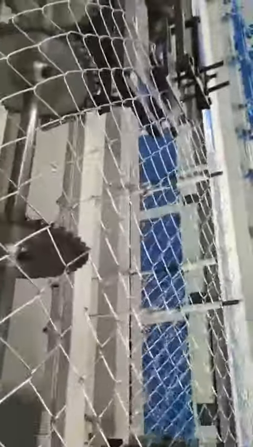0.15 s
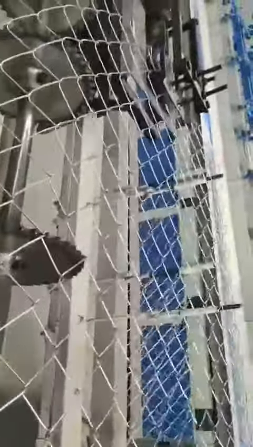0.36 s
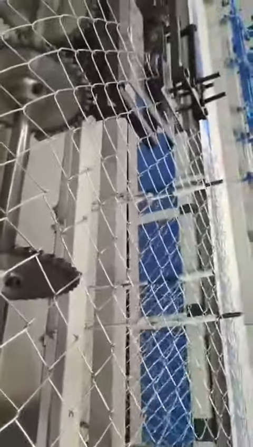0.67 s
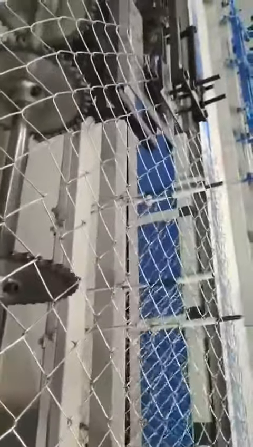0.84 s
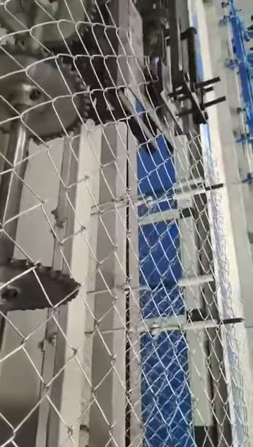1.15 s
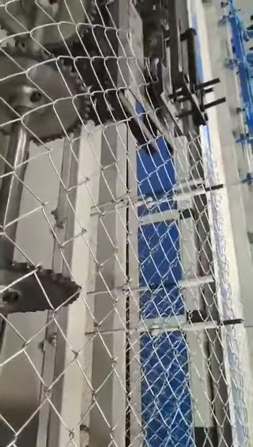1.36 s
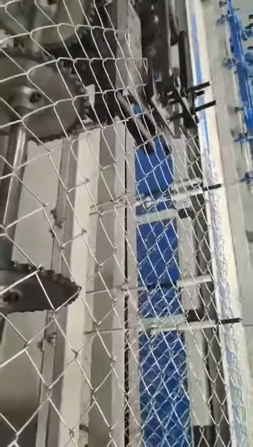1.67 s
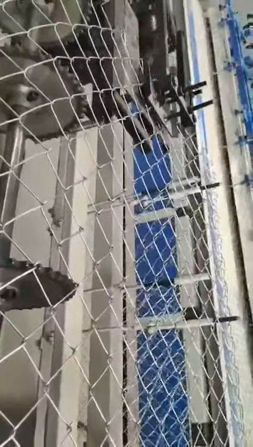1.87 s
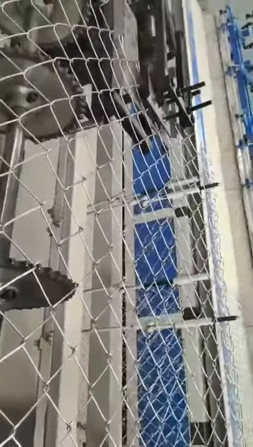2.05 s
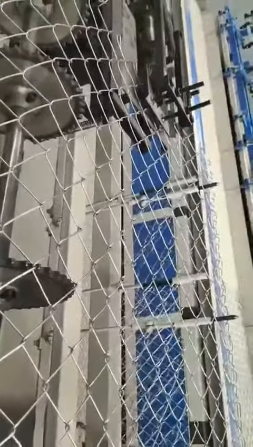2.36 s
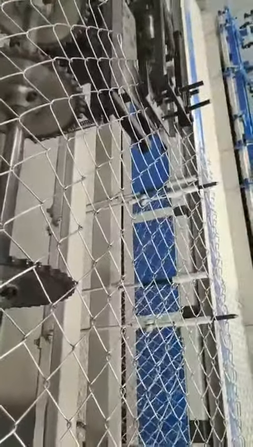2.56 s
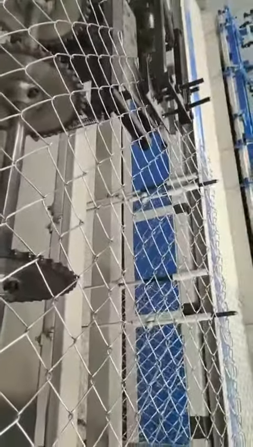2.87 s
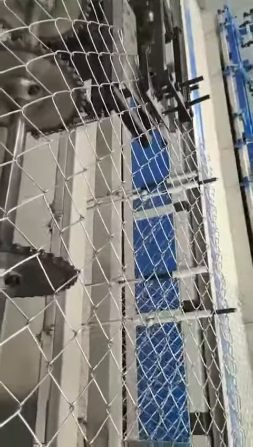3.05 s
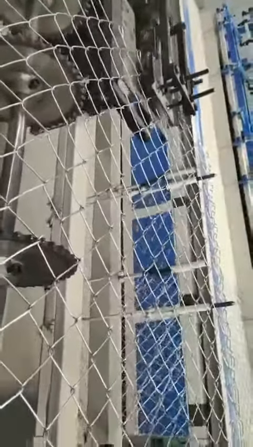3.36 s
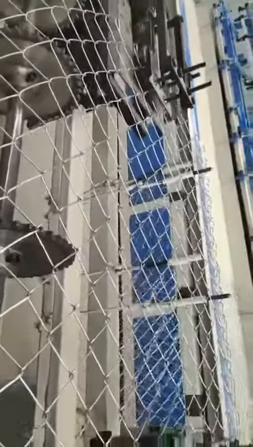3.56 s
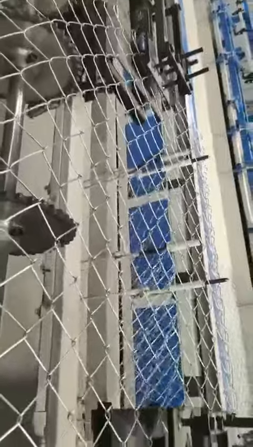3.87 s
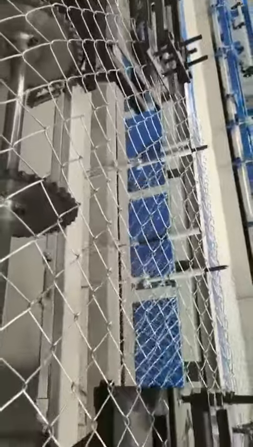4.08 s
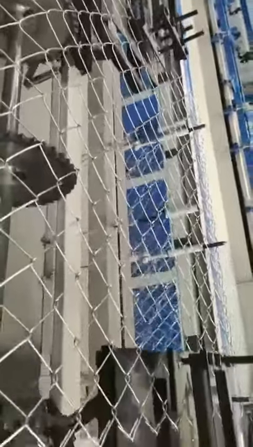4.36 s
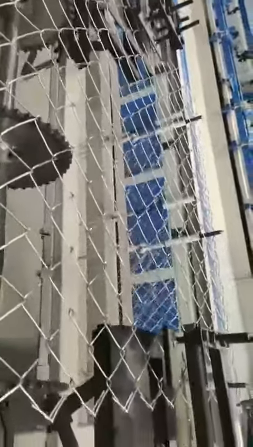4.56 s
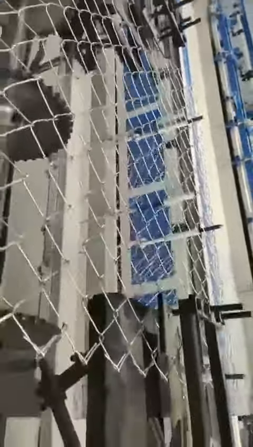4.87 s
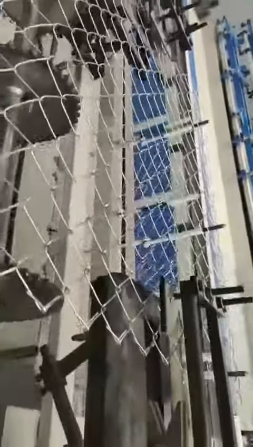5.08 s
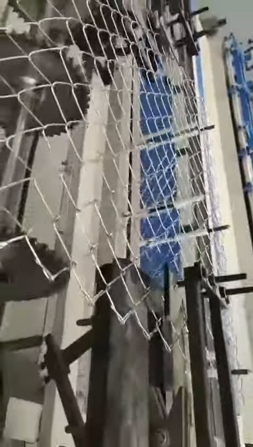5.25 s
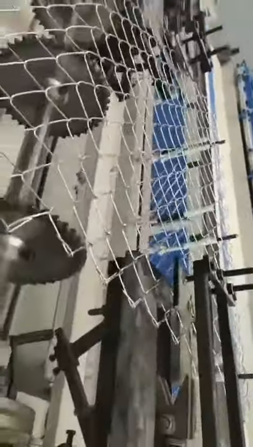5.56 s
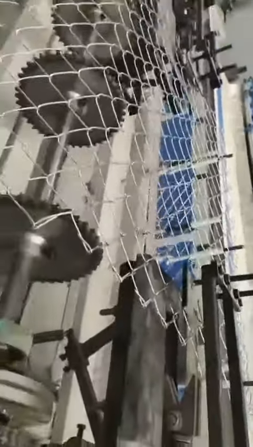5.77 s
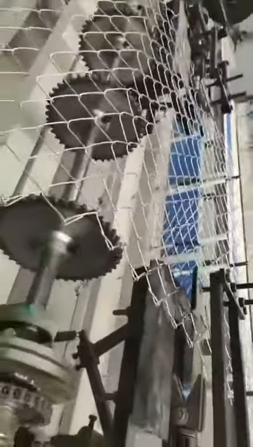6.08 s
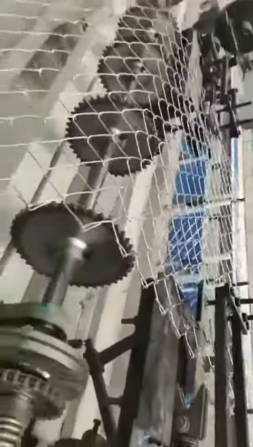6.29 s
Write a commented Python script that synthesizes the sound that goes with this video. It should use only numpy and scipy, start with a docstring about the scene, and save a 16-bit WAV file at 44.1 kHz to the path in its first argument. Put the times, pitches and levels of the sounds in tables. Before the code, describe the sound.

Close to a wire-mesh weaving machine: chains rattle, a cutter knocks, then a turning wire spiral scrapes rhythmically and squeals until the next knock.

```python
"""A chain link fence machine runs its four-second cycle in a factory hall, close to a mono microphone, motors humming.
A wire spiral coasts to rest and loose ends clink, with snaps and pings; the cutter knocks, thudding and ringing the frame;
chains and sprockets, heard as dense small impacts, pull the mesh on. The next spiral strikes steel and screws in,
scraping once a turn, its resonances squeaking and singing; then the cutter knocks and a further spiral starts."""
import sys
import numpy as np
from scipy import signal
from scipy.fft import rfft, irfft
from scipy.io import wavfile
from scipy.ndimage import map_coordinates

SR = 44100
rng = np.random.default_rng(int(sys.argv[2]) if len(sys.argv) > 2 else 0)


def unload_audio(sound):
    """Save the sound as a 16-bit wav file, at the path given as the first command line argument."""
    columns = np.transpose(np.atleast_2d(sound))
    # keep every value between -1 and 1, then stretch to whole-number steps
    steps = np.round(np.clip(columns, -1, 1) * 32767)
    wavfile.write(sys.argv[1], SR, steps.astype(np.int16))


N = 283122
TIME = np.arange(N) / SR
RUN_S = 2.877  # the spiral runs across the mesh for this long
SQUEAK_HZ = 5522  # main mode of the spiral, about which squeaks and squeal waver

# One row for each spiral, from the cut that starts its cycle. Each row: cut in seconds, frame rumble trim in dB,
# chain rattle trim in dB, feed in dB, feed drag in dB against the feed, entry of the spiral in seconds after the cut,
# build-up of its grip in seconds, coasting down of the spindle in dB per second, scraping base level in dB,
# binding at full depth in dB, singing base level at full depth in dB.
CYCLES = [(-3, -0.5, -2, -30, -10, 0.61, .05, 23, -29.5, -9, -53),
          (1.1654, -1, 0.37, -28.5, -7, 0.59, 0.09, 43, -33.5, 4, -33.7),
          (5.13, 1, -0.5, -32, -14.5, .662, 0.014, 44, -36, 0, -50)]
# Spectrum of steel scraping on steel. Each row: frequency in Hz, relative level in dB per Hz.
SCRAPE = [(1200, -51), (2500, 5), (3200, 1), (4300, 1.5), (5000, 2), (5900, 2.5), (6700, -4), (7500, -1.5),
          (8000, -22.5)]
# Spectrum of links crashing together. Each row: frequency in Hz, relative level in dB per Hz.
CRASH = [(800, -17), (2200, -16.5), (3500, 2.5), (4600, 3), (5700, 3.5), (6600, -2.5), (8000, -11)]


def gain_of(db):
    """Decibels to amplitude."""
    return 10 ** (np.asarray(db) / 20)


def evened(x):
    """Scales to rms 1."""
    return x / np.sqrt(np.mean(x ** 2) + 1e-20)


def read(points, hz):
    """Reads a spectrum on a log-frequency axis."""
    f, value = np.transpose(points)
    return np.interp(np.log(hz + 1), np.log(f + 1), value)


def add(mix, s, sound):
    """Mixes a sound in at time s."""
    part = mix[max(round(s * SR), 0):][:len(sound)]
    part += sound[:len(part)]


def coloured(x, spectrum):
    """Gives x a spectrum, at rms 1."""
    gain = gain_of(read(spectrum, np.fft.rfftfreq(len(x), 1 / SR)))
    return evened(irfft(rfft(x) * gain, len(x)))


def drift(hz, size=N):
    """Smooth chance of rms 1 that moves up to hz times a second."""
    knots = rng.standard_normal(4096)
    position = np.arange(size) / SR * hz * 2
    return evened(map_coordinates(knots, [position], order=3, mode="wrap"))


def resonate(x, hz, width):
    """A steep resonance: two equal two-pole stages."""
    b, a = signal.iirpeak(hz, hz / abs(width), SR)
    return signal.lfilter(b, a, signal.lfilter(b, a, x))


def ringing(x, resonances):
    """Sounds x through a set of resonances, at rms 1."""
    return evened(sum(gain_of(db) * evened(resonate(x, hz, width)) for hz, width, db in resonances))


def impacts(per_s, spread_db, size=N):
    """A train of tiny random contacts whose strengths scatter by spread_db, at rms 1."""
    strength = gain_of(spread_db * np.minimum(rng.exponential(1, size), 4))
    hits = rng.choice([-1, 1], size) * (rng.random(size) < per_s / SR)
    return evened(strength * hits)


def stroke(t, rise, t60):
    """Envelope of a blow: quick rise, exponential decay, both in seconds."""
    return (1 - np.exp(-t / rise)) * np.exp(-np.log(1000) * t / t60)


def jingling(low_hz, high_hz, per_s, t60, spread_db):
    """Many small steel parts ping at random, each at its own pitch, at rms 1 together."""
    out, t = np.zeros(N), TIME[:SR // 8]
    pings = rng.random((4096, 3))[:round(per_s * N / SR)]
    decay = stroke(t, .0008, t60)
    for when, pitch, size in pings:
        hz = low_hz * (high_hz / low_hz) ** pitch
        add(out, when * N / SR, gain_of(spread_db * size) * np.sin(2 * np.pi * hz * t) * decay)
    return evened(out)


def chattering(x, swing_db, rate_hz, count=7):
    """Separate parts chatter on their own: each band of x comes and goes at random."""
    spectrum, pitch = rfft(x), np.log(np.fft.rfftfreq(N, 1 / SR) + 1)
    centres = np.log(np.geomspace(500, 3400, count))
    out = np.zeros(N)
    for band in np.eye(count):
        part = irfft(spectrum * np.interp(pitch, centres, band), N)
        out += part * gain_of(swing_db * drift(rate_hz))
    return evened(out)


def cycle():
    """At every sample: the seconds since the last cut, then the other columns of that cycle."""
    rows = np.array(CYCLES)
    cut, *settings = rows[np.searchsorted(rows[:, 0], TIME, "right") - 1].T
    return TIME - cut, *settings


def step(since, start, length, attack_s, release_db_per_s):
    """Envelope of one step of the cycle: attack, hold, release."""
    t = since - start
    return np.clip(t / attack_s, 0, 1) * gain_of(-release_db_per_s * np.maximum(t - length, 0))


def spindle():
    """Seconds since the spiral entered the mesh; how hard the spindle runs and how deep the spiral is, both 0-1."""
    since, _, _, _, _, enter_s, grip_s, coast_db_per_s, *_ = cycle()
    inside = since - enter_s
    running = step(inside, 0, RUN_S, attack_s=grip_s, release_db_per_s=coast_db_per_s)
    return inside, running, np.clip(inside / RUN_S, 0, 1)


def weaving(turns_per_s=10.65, swing_db=0.74, link_db=-9, catch_s=0.043, slack_db=-17, shaken_db=-2.0, tick_db=-2):
    """The turning spiral scrapes through the mesh, harder once a turn, and shakes the links."""
    # Resonances of the mesh. Each row: frequency in Hz, width of each filter stage in Hz, level in dB.
    mesh = [(500, 510, 1), (2460, 840, 2.5)]
    # Resonances of the loose links. Each row: frequency in Hz, width of each filter stage in Hz, level in dB.
    loose_links = [(2740, 600, 1), (3240, 280, -5.5)]
    since, *_, grip_s, _, scrape_db, bind_db, _ = cycle()
    inside, running, depth = spindle()
    since_catch = (TIME - catch_s) % (1 / turns_per_s)
    turn = np.cos(2 * np.pi * turns_per_s * since_catch)

    threading = running * gain_of(bind_db * depth ** 3)
    # it scrapes harder while its tip finds the first links
    entry = gain_of(2) * step(inside, 0, 0.49, attack_s=grip_s, release_db_per_s=47)
    # the links are shaken just after the cut
    shaken = gain_of(shaken_db) * step(since, 0, .08, attack_s=0.015, release_db_per_s=27.5)
    # its tip rubs along the guide close to the entry: -6 dB at the mesh, 65 dB less per second away from it
    approach = gain_of(-6 - 65 * abs(inside))
    contact = np.sqrt(threading ** 2 + approach ** 2 + entry ** 2 + shaken ** 2 + gain_of(slack_db) ** 2)
    links = jingling(low_hz=2997, high_hz=6766, per_s=220, t60=0.13, spread_db=4.5)
    rubbing = coloured(impacts(per_s=6000, spread_db=0.5), SCRAPE)
    scrape = (rubbing + gain_of(link_db) * links) * gain_of(scrape_db) * contact

    tick = coloured(rng.standard_normal(N), CRASH) * stroke(since_catch, .002, 0.18)
    ticks = tick * threading * gain_of(scrape_db + tick_db)

    # half way across, the mesh shudders against its guides
    shaking = gain_of(-31.8) * step(since, 1.612, 0.48, attack_s=0.11, release_db_per_s=245)
    shudder = ringing(impacts(per_s=280, spread_db=2.0), mesh) * shaking
    # the entering spiral shakes loose links
    rattling = gain_of(-33.5) * step(inside, .17, 0.38, attack_s=0.081, release_db_per_s=60.5)
    rattle = ringing(impacts(per_s=500, spread_db=0.0), loose_links) * rattling
    return (scrape + shudder) * gain_of(swing_db * turn) + ticks + rattle + singing(turn)


def singing(turn, swing_db=1.0, slip_db=2.6, squeal_db=-2.6, flutter_db=3.8, waver_hz=62, pulse_db=1.2):
    """Deep in the mesh the spiral's resonances ring, and its main mode holds a thin squeal that pulses with each turn."""
    # Resonances of the wire spiral. Each row: frequency in Hz, width of each filter stage in Hz, level in dB.
    spiral = [(3940, 400, -7), (4800, 480, -4), (5580, 330, -4.5), (6000, 1200, -6), (7380, 700, -13.5)]
    sing_after_s, growth_db = 0.76, 7  # seconds in the mesh; rise in dB over the full depth
    sing_db = cycle()[-1]
    inside, _, depth = spindle()
    ring = ringing(impacts(per_s=2500, spread_db=-1.0), spiral) * gain_of(slip_db * drift(40))
    phase = 2 * np.pi * np.cumsum(SQUEAK_HZ + waver_hz * drift(70)) / SR
    squeal = gain_of(squeal_db + flutter_db * drift(45) + pulse_db * turn) * np.sin(phase)
    held = step(inside, sing_after_s, RUN_S - sing_after_s - 0.01, attack_s=0.18, release_db_per_s=75.5)
    return (ring + squeal) * held * gain_of(sing_db + growth_db * (depth - 1) + swing_db * turn)


def squeaks(squeak_db=-5.6, swell_s=0.0092, waver_hz=50):
    """Each catch on a link sets the spiral's main mode swelling and dying within a few hundredths of a second."""
    # The spiral catches on a link. Each row: start in seconds, peak level in dB before the common squeak_db.
    catches = [(2.452, -25), (2.53, -28), (2.748, -21), (2.944, -20), (3.045, -17.5), (3.227, -17),
               (3.295, -25), (3.394, -17.5), (3.505, -25), (3.591, -19.5), (3.784, -19.5), (3.875, -23),
               (4.100, -20.5), (4.311, -18), (4.385, -21), (4.578, -18.5)]
    out, t = np.zeros(N), TIME[:SR // 10]
    swell = t / swell_s * np.exp(1 - t / swell_s)
    for s, db in catches:
        phase = 2 * np.pi * np.cumsum(SQUEAK_HZ + waver_hz * drift(92, size=len(t))) / SR
        add(out, s, gain_of(db + squeak_db) * swell * np.sin(phase))
    return out


def strikes(rise=.0004, falloff_db_per_octave=18, crack_db=1, crack_t60=.05, detune=.012):
    """A crack of steel on steel, then the wire's modes ring, loudest around one pitch, a little retuned by each blow."""
    # The spiral's tip strikes steel. Each row: start in seconds, level in dB, loudest pitch in Hz, ring t60 in seconds.
    tip_blows = [(1.768, -32, 7400, .06), (1.810, -21, 5500, .11), (1.999, -19, 5000, .11),
                 (4.264, -24, 4700, .06), (4.387, -27, 4700, .12), (5.984, -19, 4350, .1)]
    # Modes of the struck wire. Each row: frequency in Hz before detuning, level in dB before the falloff.
    wire_modes = [(4328, -3), (4660, 0), (4716, -4), (4877, -6), (5195, -4), (5570, -2), (5690, -7),
                  (6804, -6), (7470, -3)]
    out, t = np.zeros(N), TIME[:SR // 3]
    for s, db, loudest_hz, t60 in tip_blows:
        ring = 0
        for hz, mode_db in wire_modes:
            level = gain_of(mode_db - falloff_db_per_octave * abs(np.log2(hz / loudest_hz)))
            cycles = hz * rng.normal(1, detune) * t + rng.random()
            ring = ring + level * np.sin(2 * np.pi * cycles)
        crack = gain_of(crack_db) * coloured(rng.standard_normal(len(t)), CRASH) * stroke(t, rise, crack_t60)
        add(out, s, gain_of(db) * (evened(ring) * stroke(t, rise, t60) + crack))
    return out


def clinks(rise=0.00057, waver_hz=70):
    """A wire end snaps free, or the mesh slaps against its guides: the links around it crash and the wire pings
    briefly."""
    # Wire ends snap against the mesh, and the mesh slaps its guides (the rows with a low, strong ring). Each
    # row: start in seconds, # crash level in dB, mean ring pitch in Hz, ring level in dB against the crash, t60
    # of both in seconds.
    clinking = [(0.035, -28, 7400, -10, .16), (.145, -28.5, 6200, -9, 0.14), (.217, -32.5, 6050, -6, .14),
                (0.324, -30, 6050, -7, 0.17), (0.513, -33, 5950, -3, 0.13), (.549, -38, 2640, 14, 0.05),
                (0.597, -32, 6600, -10, 0.25), (0.753, -37, 6100, -9, 0.27), (1.131, -28, 3140, -11, 0.16),
                (1.140, -29.5, 5500, -11, 0.12), (1.294, -28.5, 2760, -1, 0.099), (1.521, -34, 5600, -7, .1),
                (1.617, -36, 5900, -8, 0.18), (1.627, -38, 2450, 9, .1), (1.766, -25, 3400, -2, 0.15),
                (1.910, -19, 4000, -14, 0.19), (2.881, -37, 2380, 14, 0.055), (2.968, -38, 2310, 13, 0.07),
                (3.038, -38, 2350, 13, .07), (3.258, -31, 2800, 12, 0.065), (3.33, -38, 2700, 14, .04),
                (5.002, -35, 5500, -14, 0.68), (5.133, -30, 5640, -13, 0.3), (5.796, -27.5, 3240, -7, 0.33),
                (5.977, -21, 3000, -6, 0.19)]
    out, t = np.zeros(N), TIME[:SR // 2]
    for s, db, hz, ring_db, t60 in clinking:
        links = impacts(per_s=6000, spread_db=0.8, size=len(t))
        wire = np.sin(2 * np.pi * np.cumsum(hz + waver_hz * drift(120, size=len(t))) / SR)
        sound = coloured(links, CRASH) + gain_of(ring_db) * evened(wire)
        add(out, s, gain_of(db) * sound * stroke(t, rise, t60))
    return out


def knocks(thud_db=4, thud_rise=0.0054, thud_t60=0.042, rise=0.0011, frame_waver=0.011):
    """A blow thuds, rings the loosely bolted frame and sets the chains clattering."""
    # Heavy blows of cutter and feed, and at 5.982 s a broad snap of wire. Each row: start in seconds, thud
    # level in dB # before the common thud_db, thud pitch in Hz, frame ring level in dB, rattle level in dB,
    # rattle t60 in seconds.
    blows = [(1.130, -10, 343, -30.5, -21.5, 0.24), (1.146, -16, 450, -36, -26, 0.9),
             (1.245, -21, 545, -38, -33, .2), (1.346, -22, 560, -44, -26, 0.14),
             (2.101, -10, 652, -51, -30, 0.084), (2.141, -13, 620, -47, -39, .12),
             (3.025, -15, 487, -46, -33.5, .08), (3.255, -17, 270, -46, -33, .08),
             (5.138, -8, 283, -31, -27.5, 0.58), (5.147, -9.5, 425, -30, -26.5, 0.75),
             (5.262, -18, 570, -40, -30.5, 0.6), (5.982, -22, 380, -44, -23, .1),
             (6.135, -18, 397, -31, -28, .25)]
    # Modes of the machine frame. Each row: mean frequency in Hz, level in dB against the ring level, t60 in seconds.
    frame_modes = [(255, -2, 0.5), (365, -6, 0.4), (455, -5, 0.35), (555, -3, 0.7), (710, -9.5, 0.3),
                   (798, -11, 0.22), (1270, -3.5, 0.5), (1400, -2.5, 0.45), (2140, -6.5, 1.1)]
    # Spectrum of the clatter after a blow. Each row: frequency in Hz, relative level in dB per Hz.
    clatter = [(35, -37.5), (150, -5), (300, 0.5), (520, 4), (640, -4), (900, -2), (1100, -5.5), (1400, -2),
               (2300, 1), (2700, -13), (4000, -25.5), (8000, -33)]
    out, t = np.zeros(N), TIME[:SR]
    for s, db, hz, ring_db, rattle_db, t60 in blows:
        thud = gain_of(db + thud_db) * np.sin(2 * np.pi * hz * t) * stroke(t, thud_rise, thud_t60)
        frame = 0
        for mode_hz, mode_db, mode_t60 in frame_modes:
            phase = 2 * np.pi * mode_hz * np.cumsum(1 + frame_waver * drift(40, size=len(t))) / SR
            frame = frame + gain_of(ring_db + mode_db) * np.sin(phase) * stroke(t, thud_rise, mode_t60)
        parts = coloured(impacts(per_s=1400, spread_db=1.2, size=len(t)), clatter)
        rattle = gain_of(rattle_db) * parts * stroke(t, rise, t60)
        add(out, s, thud + frame + rattle)
    return out


def drive(drive_db=-1, flutter_db=0.44, jingle_db=-8):
    """Chain rollers drop into the sprockets, jingle and shake the frame; the feed adds a hollow drag."""
    # Load on the drive through every cycle. Each row: seconds after the cut, frame rumble in dB, chain rattle in dB,
    # both before the trims of the cycle and the common drive_db.
    load = [(0, -36, -29), (0.16, -29, -27.5), (0.38, -34.5, -30.5), (0.68, -31, -25), (0.9, -40.5, -26.2),
            (1.1, -32.5, -24.7), (1.44, -38, -29), (2.05, -36, -28), (2.45, -43.5, -31.5), (3.35, -46, -29),
            (3.65, -35.5, -31.5), (4, -43, -33)]
    # Spectrum of the shaken frame. Each row: frequency in Hz, relative level in dB per Hz.
    frame_spectrum = [(40, -39.5), (90, -13.5), (170, -5.5), (260, -3), (340, -6), (430, -2), (560, -4.5),
                      (900, -22), (2000, -45.5)]
    # Spectrum of the chains. Each row: frequency in Hz, relative level in dB per Hz.
    chain_spectrum = [(250, -29), (450, -6), (750, -0.5), (1000, 0.5), (1500, 0.5), (2300, 0), (2900, -3),
                      (3600, -12.5), (5000, -15.5), (8000, -38.5)]
    # Resonances of the feed. Each row: frequency in Hz, width of each filter stage in Hz, level in dB.
    feed_resonances = [(260, 117, -1.5), (768, 270, 1)]
    since, rumble_db, chain_db, feed_db, drag_db, *_ = cycle()
    s, frame_db, rattle_db = np.transpose(load)
    shaken_frame = coloured(impacts(per_s=2500, spread_db=1.5), frame_spectrum)
    rumble = shaken_frame * gain_of(np.interp(since, s, frame_db) + rumble_db)

    contacts = coloured(impacts(per_s=6000, spread_db=1.5), chain_spectrum)
    rollers = chattering(contacts, swing_db=2.0, rate_hz=35)
    pins = jingling(low_hz=599.0, high_hz=3003, per_s=240, t60=0.088, spread_db=12)
    chain_level = gain_of(np.interp(since, s, rattle_db) + chain_db + flutter_db * drift(22))
    rattle = (rollers + gain_of(jingle_db) * pins) * chain_level

    # the feed pulls the mesh on
    pull = gain_of(feed_db) * step(since, 0.436, 0.33, attack_s=0.067, release_db_per_s=89)
    dragging = impacts(per_s=3500, spread_db=0.5)
    feed = (ringing(dragging, feed_resonances) + gain_of(drag_db) * coloured(dragging, SCRAPE)) * pull
    return gain_of(drive_db) * (rumble + rattle) + feed


def groans(groan_db=-1, waver=.028, rough_db=2.2):
    """A motor taking up load sounds a rough, gliding tone that swells and fades."""
    # Motors take up load. Each row: start in seconds, length in seconds, first mean pitch in Hz, last mean pitch in Hz,
    # peak level in dB before the common groan_db and the roughness.
    loadings = [(1.846, 1.12, 113, 77.7, -46), (2.144, 0.26, 714, 726, -31.5), (4.99, .13, 560, 640, -33),
                (5.977, 0.87, 105.3, 79.5, -45), (5.992, 0.34, 419, 371, -32.5)]
    out = np.zeros(N)
    for s, length, first_hz, last_hz, db in loadings:
        progress = np.clip((TIME - s) / length, 0, 1)
        hz = first_hz + (last_hz - first_hz) * progress
        phase = 2 * np.pi * np.cumsum(hz * (1 + waver * drift(50))) / SR
        level = gain_of(db + groan_db + rough_db * drift(25))
        out += level * np.sin(np.pi * progress) * np.sin(phase)
    return out


def hall(hall_db=-32, waver_hz=7.0, waver_db=2.8, idle_db=-4.4, loaded_db=7):
    """The wash of far machines, and motor tones that swell as the spiral binds and bend upward once it is free."""
    # Spectrum of the far machines. Each row: frequency in Hz, relative level in dB per Hz.
    far_spectrum = [(25, -36), (50, -18.5), (90, -11.5), (130, -6), (220, 1), (380, 0), (480, 0.5),
                    (680, -1), (920, 1), (1100, -6), (2200, -3.5), (3400, -25), (7800, -27)]
    # Motor tones. Each row: mean pitch in Hz at speed ratio 1, level in dB before idle_db and the swells.
    motors = [(468.5, -39.5), (533, -53), (937, -46.5)]
    # Freed of the spiral, the motors speed up around each cut. Each row: seconds from the cut, speed ratio, swell in dB.
    free_run = [(-.42, 1, -1), (-.26, 1.125, 5), (-.04, 1.14, 8), (.12, 1.2, 7), (.28, 1.21, 3),
                (.36, 1.17, -6), (.4, 1, 0)]
    full_load_depth, load_follow = .87, .8  # depth 0-1 at full load; dB of load per dB of weaker binding
    wash = gain_of(hall_db) * coloured(rng.standard_normal(N), far_spectrum)

    cuts = np.array(CYCLES)[:, 0]
    nearest = abs(TIME[:, None] - cuts).argmin(axis=1)
    from_cut = TIME - cuts[nearest]
    s, ratio, free_db = np.transpose(free_run)
    speed = np.interp(from_cut, s, ratio, 1, 1)
    swell = gain_of(np.interp(from_cut, s, free_db, 0, 0))
    tones = np.zeros(N)
    for hz, db in motors:
        level = gain_of(db + waver_db * drift(9))
        phase = 2 * np.pi * np.cumsum(hz * speed + waver_hz * drift(22)) / SR
        tones += level * np.sin(phase)

    _, running, depth = spindle()
    bind_db = cycle()[-2]
    # a spiral that binds less loads the motors less
    binding = gain_of(load_follow * np.minimum(bind_db, 0))
    load = running * np.minimum(depth / full_load_depth, 1) ** 4 * binding
    return wash + swell * tones * gain_of(idle_db + loaded_db * load)


def reverberation(x):
    """The hall's sparse reflections of random sign, each band dying at its own speed."""
    # Reverberation of the hall. Each row: frequency in Hz, t60 in seconds.
    echo = [(150, 1), (1000, 0.3), (4000, 0.88), (8000, 0.3)]
    taps = rng.choice([-1., 1.], SR) * (rng.random(SR) < 2000 / SR) * (TIME[:SR] > .004)
    hz, t, bands = signal.stft(taps, SR, nperseg=256)
    decay = np.exp(-np.log(1000) * t / read(echo, hz)[:, None])
    tail = signal.istft(bands * decay, SR)[1]
    return signal.fftconvolve(x, tail / np.linalg.norm(tail))[:N]


def scene(wet_db=-8):
    """The running machine and the hall, with the echo of the sharp sounds; the same in both channels."""
    sharp = squeaks() + clinks() + strikes() + knocks()
    machine = weaving() + sharp + drive() + groans()
    mono = machine + gain_of(wet_db) * reverberation(sharp) + hall()
    return np.array([mono, mono])


def record(dry, edge_hz=7900):
    """The recorder's steep band limit."""
    low_pass = signal.firwin(601, edge_hz, window=("kaiser", 9), fs=SR)
    return signal.oaconvolve(dry, low_pass[None], "same")


dry = scene()
out = record(dry)
unload_audio(out)
```